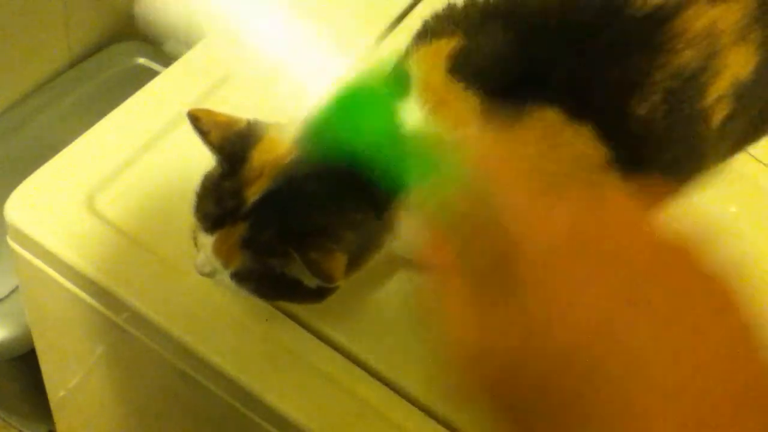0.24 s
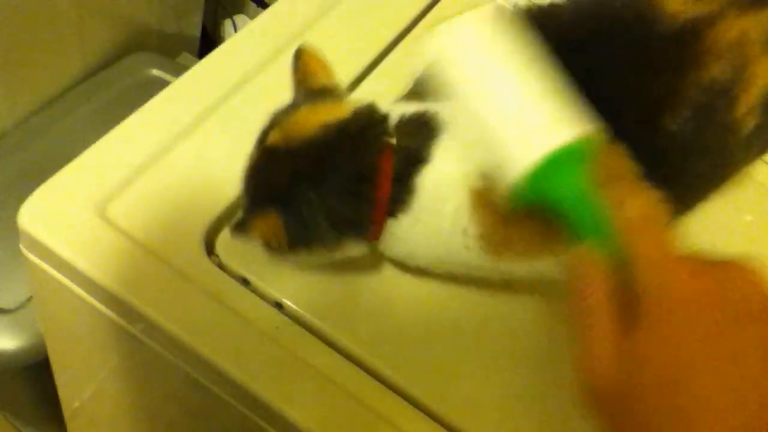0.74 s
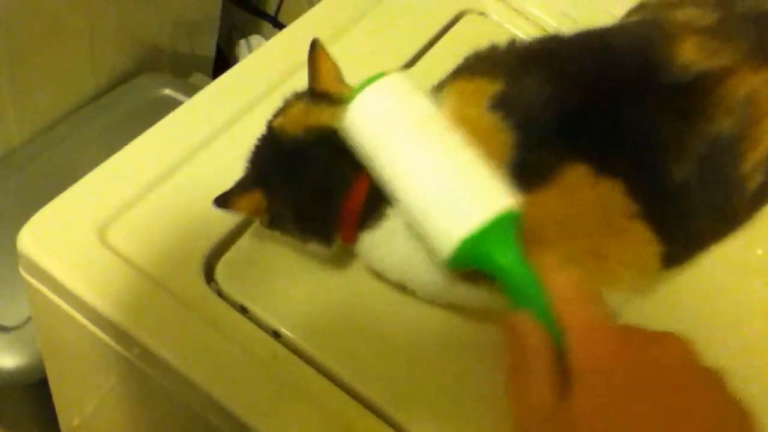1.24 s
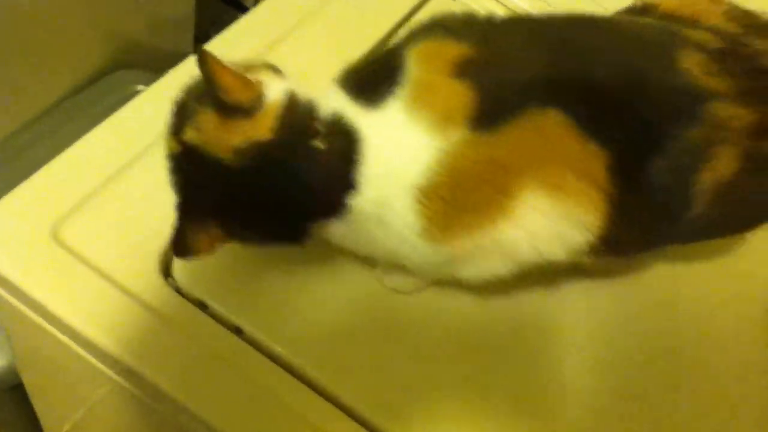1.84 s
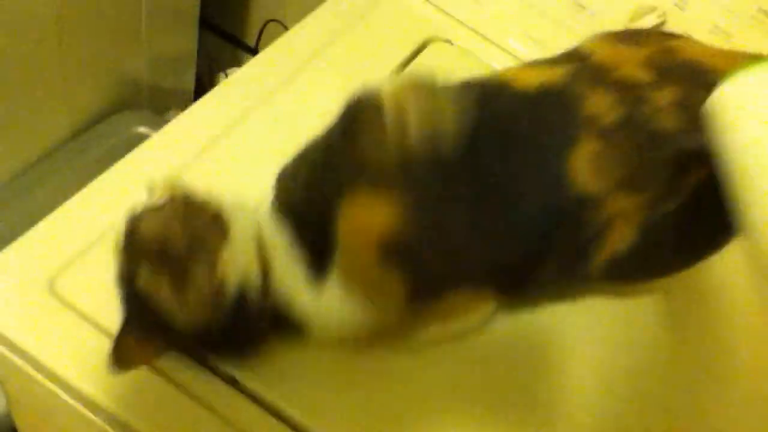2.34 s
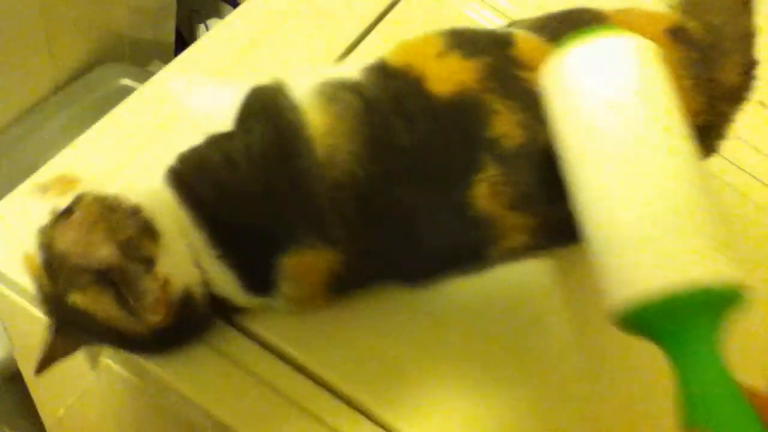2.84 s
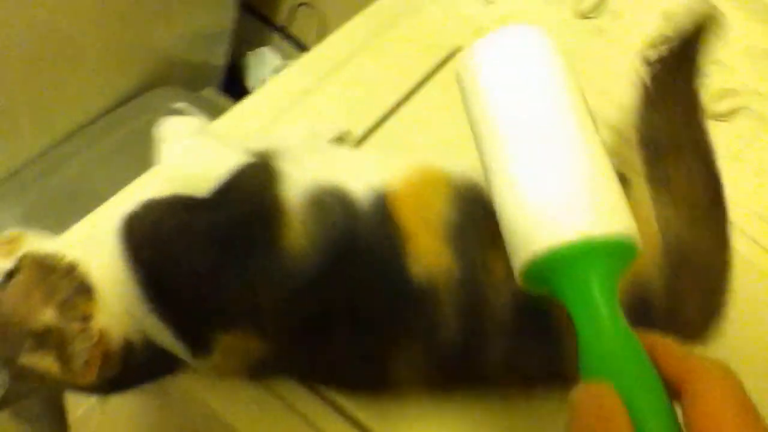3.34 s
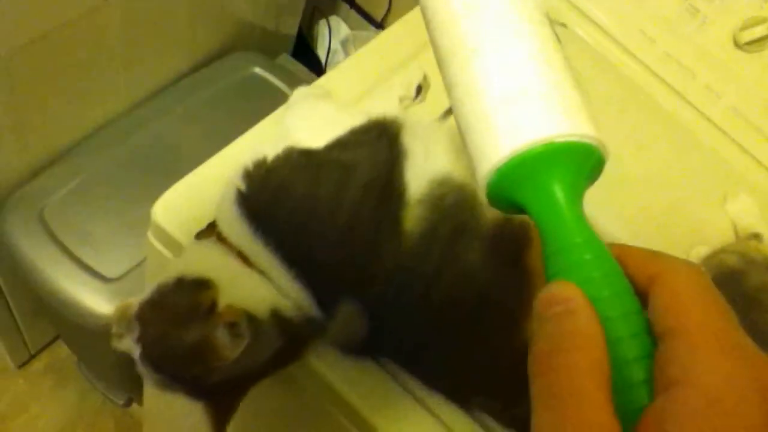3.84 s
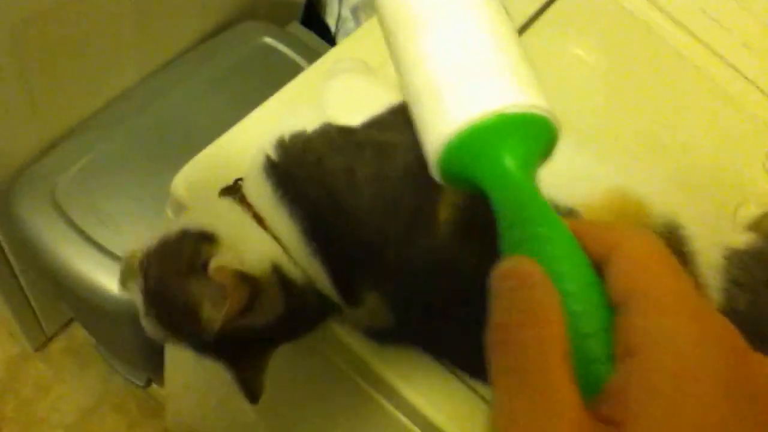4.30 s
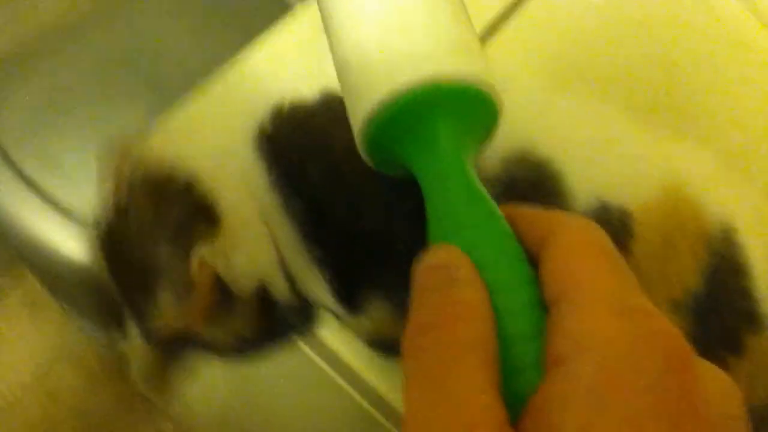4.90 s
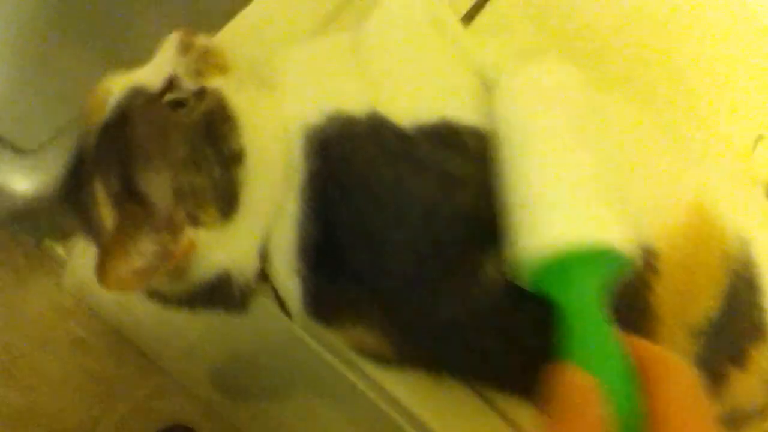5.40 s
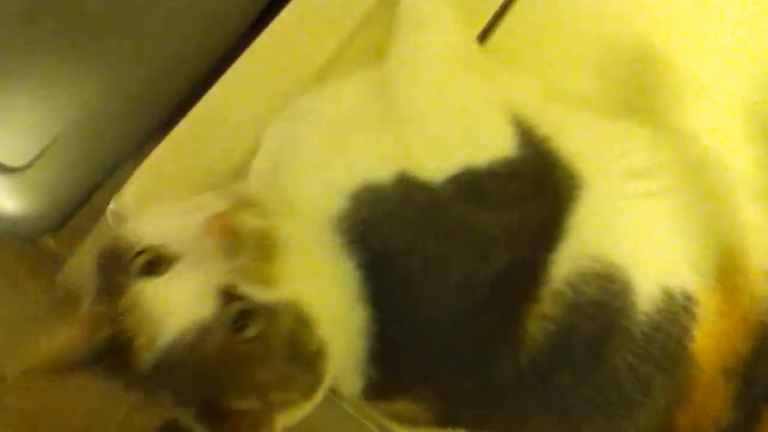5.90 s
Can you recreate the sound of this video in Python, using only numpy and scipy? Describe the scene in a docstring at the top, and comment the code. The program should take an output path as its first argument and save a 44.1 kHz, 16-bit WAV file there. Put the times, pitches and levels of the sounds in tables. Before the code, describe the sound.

In a small, hard-walled room a cat purrs quietly throughout, a low flutter of about thirty pulses a second that swells at around 0.9, 2.2, 3.7 and 5.3 seconds. A sticky lint roller gives two quick crackles at 0.1 to 0.25, then strokes at 0.75 to 1.05 with a tiny scrape, and stronger peeling crackles from 1.5 to just past 2.0. The loose roll clacks at 0.6 and hard at 1.15. Dull bumps on the lid at 2.25 to 2.5 end in a bright, loud plastic clack. More clacks come at 2.95, 3.25 and 3.4, with short hollow scrapes to 3.5. Soft clacks and thumps fall near 4.2. A longer hollow scrape at 5.15 leads to light clacks at 5.4 and 5.6 and crackling until about 5.9. Motor hum, wavering low tones, rumble, microphone hiss and faint electrical ticking continue behind.

```python
"""A cat purrs on the lid of a washing machine: larynx pulses and breath excite its throat.
A sticky lint roller crackles over its fur as bursts of random impulses, and its hollow roll scrapes.
The loose roll clacks on its plastic handle, ringing decaying modes in a small, hard-walled room.
Damped swings thump the lid. Behind lie a motor's hum, wavering low tones, rumble,
hiss from the microphone and a faint electrical ticking."""
import sys
import numpy as np
from scipy import signal
from scipy.fft import rfft, irfft, next_fast_len
from scipy.io import wavfile
from scipy.ndimage import map_coordinates

SR = 44100
rng = np.random.default_rng(int(sys.argv[2]) if len(sys.argv) > 2 else 0)


def to_wav(s):
    """Save 16-bit WAV."""
    ch = np.atleast_2d(s).T  # columns
    pcm = np.round(np.clip(ch, -1, 1) * 32767)  # PCM
    wavfile.write(sys.argv[1], SR, pcm.astype(np.int16))


N = 271215

# Resonant colour of the throat: [f/Hz, relative level/dB]
THROAT = [(20, -8), (60, -10), (100, -1.5), (140, -0.5), (175, -2.5), (205, 2.5), (260, -3), (330, -9),
          (430, -9), (650, -17), (1200, -21), (3000, -59.5)]
# In-breaths, on each of which the purr swells: [start t/s, length t/s, level/dB]
BREATHS = [(0.92, 0.4, -51), (2.24, 0.6, -47.5), (3.738, 0.46, -50), (5.301, 0.58, -51)]
BREATH_RISE_S, BREATH_FALL_S, BREATH_ARCH_DB = 0.12, 0.12, 3  # times per 20 dB; middle over ends
QUIET_PURR_DB = -57.5  # between the in-breaths
PURR_HZ, PURR_SLOWING_HZ = 31.59, 2.5  # pulse rate; its drop at the height of an in-breath


def purr():
    """Source-filter principle: each closing of the larynx sends a thud and a puff through the throat."""
    swells = np.array([gesture(s, length, BREATH_RISE_S, BREATH_FALL_S, BREATH_ARCH_DB)
                       for s, length, db in BREATHS])
    level = np.max([amp(db) * swell for (s, length, db), swell in zip(BREATHS, swells)], axis=0)
    rate = PURR_HZ - PURR_SLOWING_HZ * swells.max(axis=0)
    cycle = np.cumsum(rate * (1 + 0.025 * wobble(14))) / SR  # slightly irregular beating
    closings = np.diff(np.floor(cycle), prepend=0)
    puffs = rng.standard_normal(N) * np.exp(-(cycle % 1) / 0.3)
    source = (1.2 * unit(puffs) - unit(closings)) * amp(0.8 * wobble(25))
    voice = signal.fftconvolve(source, struck(lambda hz: along(THROAT, hz)))[:N]
    voice = signal.fftconvolve(voice, room(direct_db=8))[:N]
    return unit(voice) * np.maximum(level, amp(QUIET_PURR_DB))


# Pushes of the sticky sheet over the fur:
# [start t/s, length t/s, level/dB, treble re that level/dB, core's ring re that level/dB]
STROKES = [(0.082, 0.067, -47.5, -5, -3.5), (0.196, 0.063, -46, -6, -10.5), (0.752, 0.091, -52, -10, -0.5),
           (0.913, 0.135, -47.5, -4, -4.5), (1.53, 0.26, -44, -7, -21), (1.814, 0.14, -46.5, -7.5, -25),
           (1.992, 0.043, -40.5, -2.5, -18), (2.69, 0.12, -60, -3, -8), (5.497, 0.16, -61, -2, -9),
           (5.653, 0.2, -51, -7, -5), (5.816, 0.12, -44, -5, -20)]
# Colour of the peeling glue: [f/Hz, relative level/dB]
PEEL = [(200, -30), (750, -14), (1130, -5), (1400, -8), (1700, -3), (2300, -2), (2650, -2), (3100, 3),
        (3900, -2), (5400, -0.5), (8000, -4), (11000, -9), (15500, -21)]
# Resonances of the cardboard core: [centre f/Hz, width f/Hz, relative level/dB]
CORE = [(1143, 48, 5.5), (2290, 600, 3), (3360, 240, -1)]
# The hand speeds up, is fastest midway and slows: times per 20 dB; middle over ends
STROKE_RISE_S, STROKE_FALL_S, STROKE_ARCH_DB = 0.077, 0.085, 0.5


def core_response(hz):
    """Resonance: each mode of the core passes a peak of its own width."""
    return sum(amp(db) / (1 + (2 * (hz - centre) / width) ** 2) for centre, width, db in CORE)


def strokes():
    """Impulsive excitation: hairs snap off the glue and ring the core; faster is louder and brighter."""
    crackle = filtered(grains(3500, spread_db=0.5, direct_db=-3.5), lambda hz: amp(along(PEEL, hz)))
    treble = filtered(crackle, lambda hz: 1 - 1 / (1 + (hz / 7000) ** 6))
    core = filtered(grains(3500, spread_db=-0.5, direct_db=-2), core_response)
    body_level, treble_level, core_level = np.zeros((3, N))
    for s, length, db, treble_db, core_db in STROKES:
        push = gesture(s, length, STROKE_RISE_S, STROKE_FALL_S, STROKE_ARCH_DB)
        body_level = np.maximum(body_level, amp(db) * push)
        treble_level = np.maximum(treble_level, amp(db + treble_db) * push ** 1.2)
        core_level = np.maximum(core_level, amp(db + core_db) * push)
    body = unit(crackle - treble) * body_level
    mix = body + unit(treble) * treble_level + unit(core) * core_level
    return mix * amp(0.97 * wobble(45))


# Scrapes of the roll turning under load, a faster turn scraping higher:
# [start t/s, length t/s, level/dB, pitch ratio]
SCRAPES = [(0.756, 0.028, -46, 1.15), (3.348, 0.02, -43, 1), (3.387, 0.027, -49, 0.87),
           (3.487, 0.035, -46, 0.8), (5.137, 0.145, -44.5, 1.004)]
# Colour of the hollow roll at pitch ratio 1: [f/Hz, relative level/dB]
TUBE = [(300, -22), (550, -13), (720, -9.5), (850, 5), (1020, -11.5), (1200, 0.5), (1400, -11.5),
        (1600, -4), (1900, -14.5), (2250, -11.5), (3100, -17.5), (5000, -25.5), (10000, -35)]
SCRAPE_RISE_S, SCRAPE_FALL_S, SCRAPE_ARCH_DB = 0.053, 0.1, 2.5  # times per 20 dB; middle over ends


def scrapes():
    """Friction: uneven slips of the roll on its spindle sound through the hollow core."""
    out = np.zeros(N)
    for s, length, db, pitch in SCRAPES:
        slips = grains(1000, spread_db=0.5, direct_db=1.5, count=2)
        rub = filtered(slips, lambda hz: amp(along(TUBE, hz / pitch)))
        out += unit(rub) * amp(db) * gesture(s, length, SCRAPE_RISE_S, SCRAPE_FALL_S, SCRAPE_ARCH_DB)
    return out * amp(3.3 * wobble(35))


# Clacks of the roll, the four band columns being relative:
# [t/s, level before a common offset/dB, thud/dB, knock/dB, snap/dB, ring/dB, rattle time constant t/s]
CLACKS = [(.578, -24, -20, -18, -27.5, -6, 0.00075), (1.140, -14.5, -17.5, -21.5, -18, -11.5, 0.00019),
          (1.334, -42.5, -15, -4, -17, -11, 0.0029), (2.503, -13, -20, -19, -9.5, -2.5, 0.0017),
          (2.964, -27, -19, -20.5, -33, -7, 0.00069), (3.257, -23, -12.5, -11.5, -21, -20, 0.00085),
          (3.382, -33.5, -5, -4, -59, 1, 0.0009), (4.155, -32, -14.5, -13, -37, -1.5, 0.0018),
          (4.246, -31.5, -12, -13, -20, -6.5, 0.004), (5.429, -33, -14, -1.5, -42, -5, 0.0013),
          (5.594, -30.5, -14.5, -3, -29, -15, 0.002)]
# Modes of the plastic: [f/Hz, mean relative level/dB, t60/s]
PLASTIC = [(440, -18, .3), (690, -11, .28), (850, -12, .3), (1180, -10, .28), (1310, -10, .26),
           (1922, -5, .22), (2153, -6, .25), (2524, -1, .31), (2871, -4, .25), (3042, -3, .24),
           (3250, -4.5, .26), (3675, -6.5, .22), (3840, -5, .2), (4450, -4, .21), (5180, -5, .22),
           (6400, -2, .15), (10190, 3.5, .19), (14812, 12, .1)]
# Colour common to the blows: [f/Hz, relative level/dB]
CLACK = [(60, -18), (250, 0.5), (450, 12.5), (700, 14.5), (1000, 11.5), (1300, 8), (1700, 0.5), (3000, 2.5),
         (4000, 3), (5500, 2.5), (7500, 7.5), (10500, 11), (13000, -1), (16000, -4)]


def clacks():
    """Impact and modal decay: the roll hits its stop and chatters; plastic and room respond."""
    out, t = np.zeros(N), np.arange(SR // 2) / SR
    for s, db, thud_db, knock_db, snap_db, ring_db, rattle in CLACKS:
        tilt = [(450, thud_db), (900, knock_db), (1800, 0), (5500, 0), (9000, snap_db)]
        build = 1 - np.exp(-t / max(rattle, 1e-4))  # the sound fills in while the parts chatter
        path = room(direct_db=-60)[:len(t)] * build
        path[0] += amp(-10.5)  # the first contact arrives directly
        # a quick rebound hollows the colour, differently at each blow
        rebound = round(rng.uniform(0.002, 0.007) * SR)
        path = path + 0.45 * np.pad(path, (rebound, 0))[:len(t)]
        colour = struck(lambda hz: along(CLACK, hz) + along(tilt, hz))
        blow = signal.fftconvolve(path, colour)[:len(t)]
        ring = np.zeros(len(t))
        for hz, level, t60 in PLASTIC:
            # the loose fit smears the phase, counted in cycles
            drift = rng.random() + np.cumsum(rng.standard_normal(len(t))) / np.sqrt(SR)
            strength_db = level + rng.normal(0, 2.5)
            softness_db = snap_db * hz / 10000  # a softer contact reaches the high modes less
            decay = amp(strength_db + softness_db - 60 * t / t60)
            ring += decay * np.sin(2 * np.pi * (hz * t + drift))
        add(out, s, amp(db - 20.5) * (unit(blow) + amp(ring_db - 1.5) * unit(ring * build)))
    return out


# Bumps and taps on the lid as the cat shifts its weight: [t/s, level before a common offset/dB, f/Hz]
THUMPS = [(2.255, -54, 217), (2.389, -37.5, 179.7), (2.460, -36, 1150), (2.475, -36, 62.4),
          (4.116, -47, 54.7), (4.241, -43, 202.4)]


def thumps():
    """Damped oscillation: the lid gives under the cat in a few quickly fading swings."""
    out, t = np.zeros(N), np.arange(SR // 4) / SR
    for s, db, hz in THUMPS:
        swell = 2 * hz * t
        envelope = swell * np.exp(1 - swell)
        add(out, s, amp(db + 1.5) * envelope * np.sin(2 * np.pi * hz * t))
    return out


def tone(hz):
    """Phase accumulation: a sine of rms 1 at a fixed or gliding frequency, its phase wavering."""
    cycles = np.cumsum(hz * np.ones(N)) / SR + rng.random()
    return np.sqrt(2) * np.sin(2 * np.pi * cycles + 0.2 * wobble(2.9))


# Partials of the motor's hum: [f/Hz, mean level/dB]
HUM = [(59.2, -54), (236.9, -61.5), (296.1, -72)]
# Lower faint tone, which sinks slowly in pitch: [t/s, mean level/dB]
LOW_TONE_DB = [(0.0, -59.5), (1.8, -63), (3.1, -56), (4.3, -57.5), (6.15, -63)]
LOW_TONE_HZ, LOW_TONE_SAG_HZ_PER_S = 95.5, 1.5
# Higher faint tone, strongest late: [t/s, mean level/dB]
HIGH_TONE_DB = [(3.3, -69), (4.0, -61), (4.9, -68), (5.7, -59)]
HIGH_TONE_HZ = 177.6
# Spectrum of the rumble and hiss: [f/Hz, relative level per Hz/dB]
FLOOR = [(15, -2.5), (28, 2), (45, -9.5), (110, -13.5), (250, -20.5), (420, -20), (800, -24.5), (1300, -26),
         (3000, -29.5), (5500, -30), (7500, -30), (10000, -31), (12000, -35), (15800, -37)]
FLOOR_DB = -50.5


def background():
    """Superposition: motor hum, wavering low tones, shaped noise and thin electrical ticks."""
    t = np.arange(N) / SR
    hum = sum(amp(db + 0.55 * wobble(3.65)) * tone(hz) for hz, db in HUM)
    low = amp(over_time(LOW_TONE_DB)) * tone(LOW_TONE_HZ - LOW_TONE_SAG_HZ_PER_S * t)
    high = amp(over_time(HIGH_TONE_DB)) * tone(HIGH_TONE_HZ)
    drone = (low + high) * amp(3.3 * wobble(5))
    air = unit(filtered(rng.standard_normal(N), lambda hz: amp(along(FLOOR, hz))))
    gate = np.exp(-((t * 30) % 1) / 0.1) * amp(4 * wobble(30))  # 30 ticks a second, uneven in level
    ticks = filtered(rng.standard_normal(N) * gate, lambda hz: 1 / (1 + ((hz - 7500) / 300) ** 2))
    return hum + drone + amp(FLOOR_DB) * air + amp(-68) * unit(ticks)


# Reverberation time of the room: [f/Hz, t60/s]
ROOM = [(200, 0.5), (1000, 0.33), (3000, 0.24), (6000, 0.17), (10000, 0.16), (15000, 0.082)]


def room(direct_db, size=256):
    """Reverberation: a path of energy 1, direct sound plus dense reflections that decay per band."""
    hz, t, z = signal.stft(rng.standard_normal(SR // 2), SR, nperseg=size)
    decay = amp(-60 * t / along(ROOM, hz)[:, None])
    tail = signal.istft(z * decay, SR, nperseg=size)[1]
    tail /= np.linalg.norm(tail)
    tail[0] += amp(direct_db)
    return tail / np.linalg.norm(tail)


def grains(per_second, spread_db, direct_db, count=3):
    """Shot noise: random impulses from several spots on the roll, each with its own room path."""
    out = np.zeros(N)
    for _ in range(count):
        hits = rng.random(N) < per_second / count / SR
        spot = hits * rng.standard_normal(N) * amp(spread_db * rng.standard_normal(N))
        out += signal.oaconvolve(spot, room(direct_db)[:SR // 4])[:N]
    return out


def gesture(start, length, rise_s, fall_s, arch_db):
    """Envelope: gain rises, arches to 1 midway and dies away, 20 dB per rise or fall time."""
    t = np.arange(N) / SR - start
    progress = np.clip(t / max(length, 1e-3), 0, 1)
    before = np.maximum(-t, 0) / max(rise_s, 1e-3)
    after = np.maximum(t - length, 0) / max(fall_s, 1e-3)
    return amp(-arch_db * (2 * progress - 1) ** 2 - 20 * (before + after))


def struck(gain_db, size=8192):
    """Minimum phase: the causal impulse response, of energy 1, that has a given colour."""
    cepstrum = irfft(np.log(amp(gain_db(np.fft.rfftfreq(size, 1 / SR)))))
    cepstrum[1:size // 2] *= 2  # fold the cepstrum onto positive times
    cepstrum[size // 2 + 1:] = 0
    h = irfft(np.exp(rfft(cepstrum)))
    return h / np.linalg.norm(h)


def filtered(x, response):
    """Linear filtering: the spectrum of x times a response of frequency."""
    m = next_fast_len(len(x) + 8192)
    return irfft(rfft(x, m) * response(np.fft.rfftfreq(m, 1 / SR)), m)[:len(x)]


def wobble(rate):
    """Slow random modulation: a smooth curve with rate knots a second."""
    knots = rng.standard_normal(int(N * rate / SR) + 4)
    return map_coordinates(knots, [np.arange(N) * rate / SR])


def along(points, hz):
    """Logarithmic frequency scale: (f/Hz, value) points interpolated at hz."""
    f, v = np.transpose(points)
    return np.interp(np.log(hz + 1), np.log(f + 1), v)


def over_time(points):
    """Linear interpolation: (t/s, value) points read at every sample."""
    s, v = np.transpose(points)
    return np.interp(np.arange(N) / SR, s, v)


def amp(db):
    """Level definition: decibels to amplitude gain."""
    return 10 ** (np.asarray(db) / 20)


def unit(x):
    """Normalisation: x at rms 1."""
    return x / np.sqrt(np.mean(x ** 2) + 1e-20)


def add(track, s, sound):
    """Superposition: mix a sound into the track at s seconds."""
    part = track[max(round(s * SR), 0):][:len(sound)]
    part += sound[:len(part)]


def scene():
    """Superposition: cat, roller and room at one microphone."""
    return (purr() + strokes() + scrapes() + clacks() + thumps() + background())[None]


TOP_HZ = 15780


def record(dry):
    """Band limitation: nothing passes at or above TOP_HZ."""
    return np.array([filtered(x, lambda hz: hz < TOP_HZ) for x in dry])


dry = scene()
out = record(dry)
to_wav(out)
```